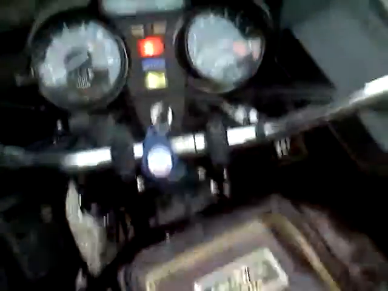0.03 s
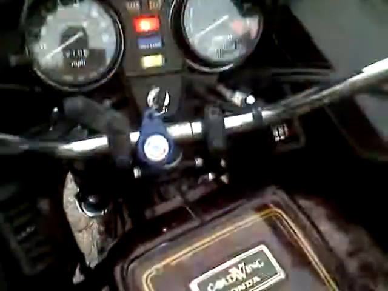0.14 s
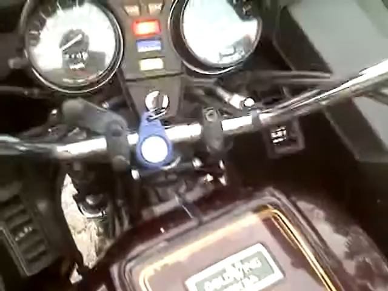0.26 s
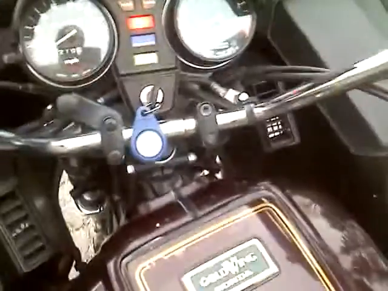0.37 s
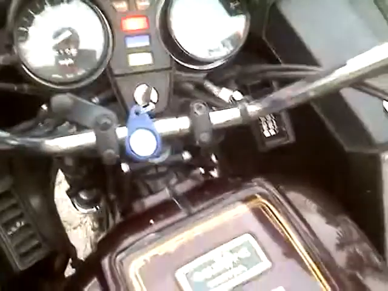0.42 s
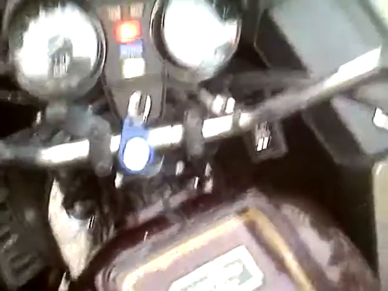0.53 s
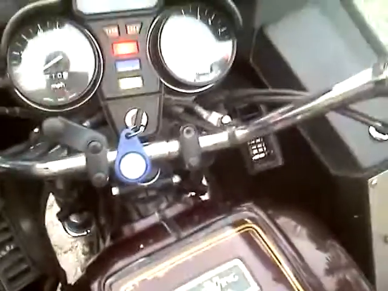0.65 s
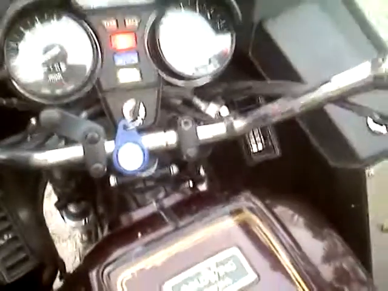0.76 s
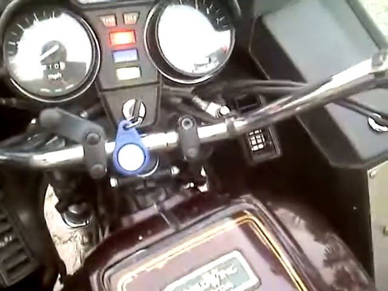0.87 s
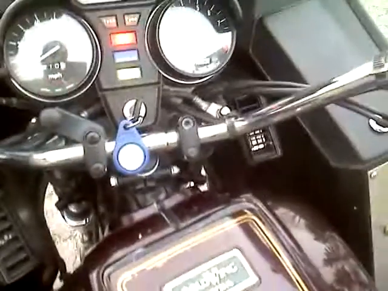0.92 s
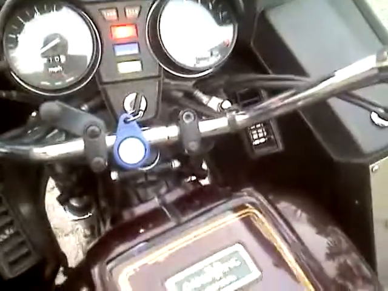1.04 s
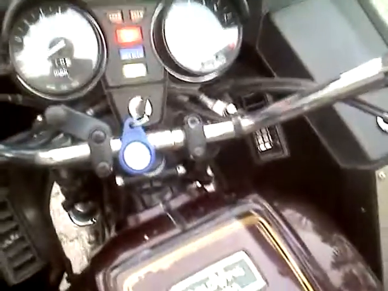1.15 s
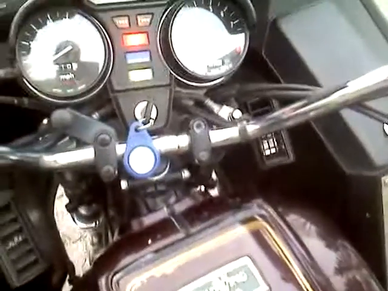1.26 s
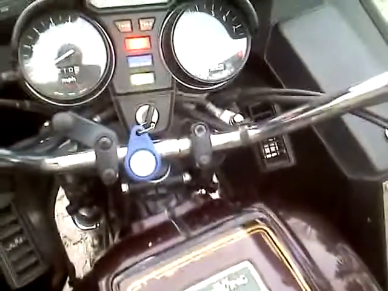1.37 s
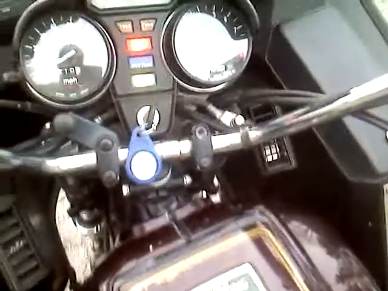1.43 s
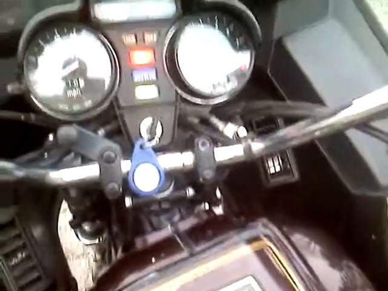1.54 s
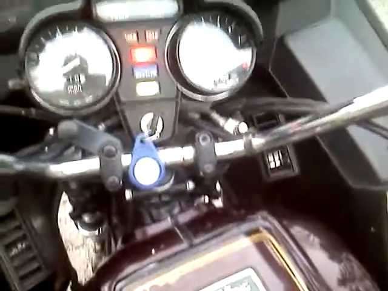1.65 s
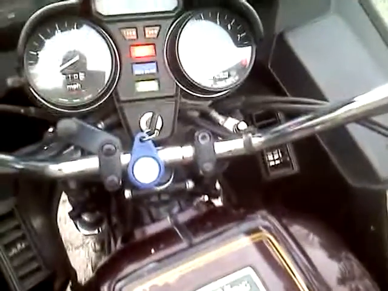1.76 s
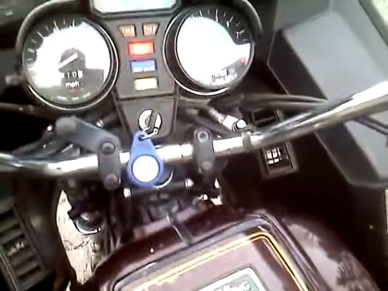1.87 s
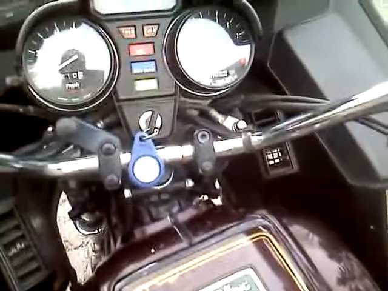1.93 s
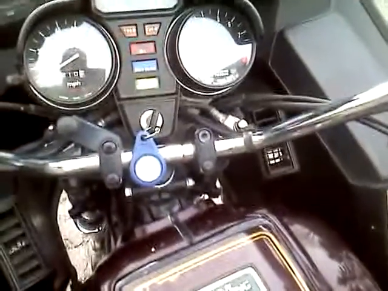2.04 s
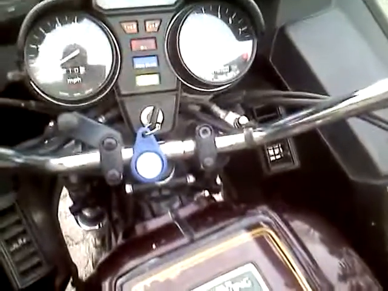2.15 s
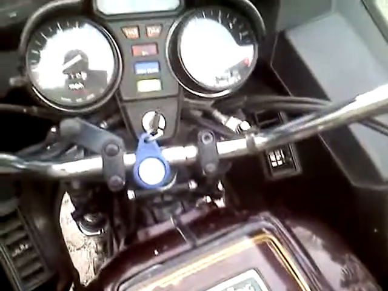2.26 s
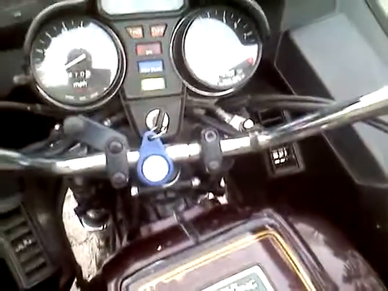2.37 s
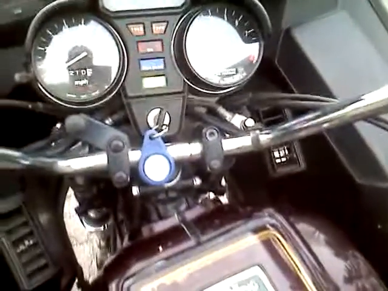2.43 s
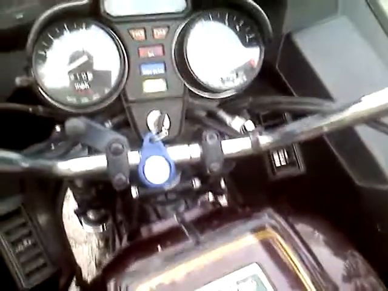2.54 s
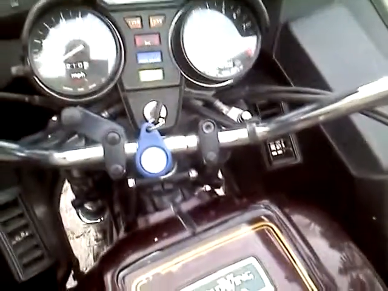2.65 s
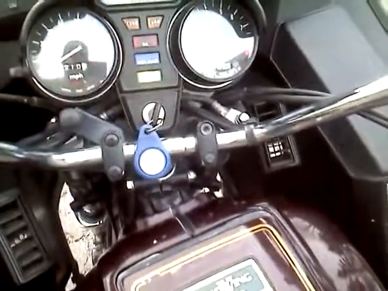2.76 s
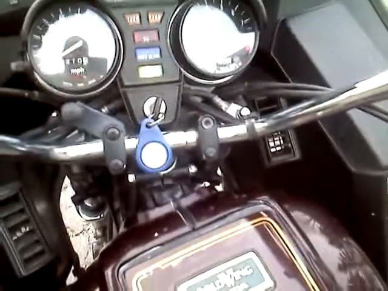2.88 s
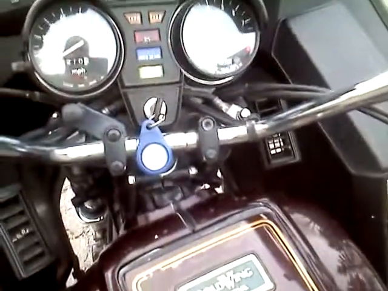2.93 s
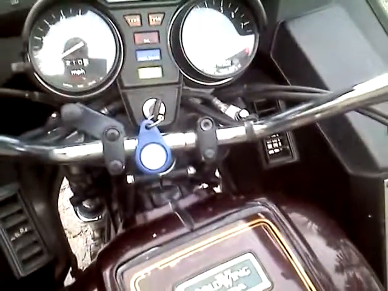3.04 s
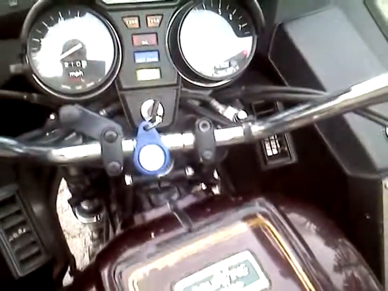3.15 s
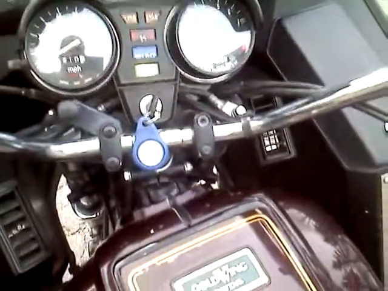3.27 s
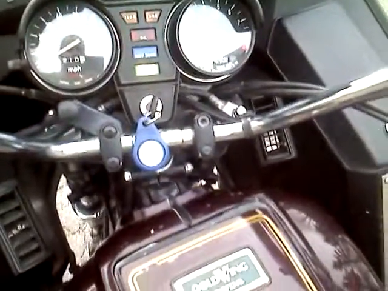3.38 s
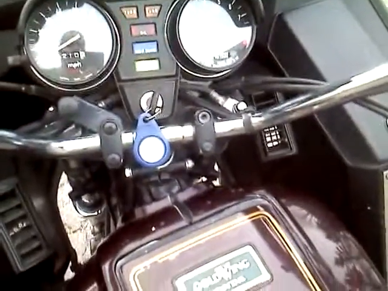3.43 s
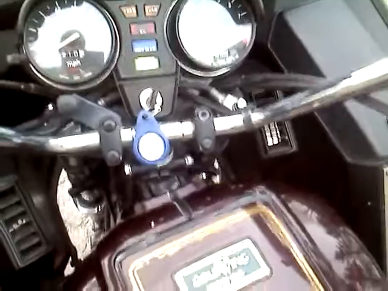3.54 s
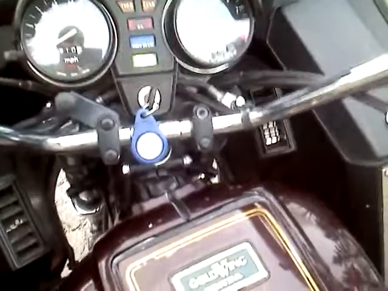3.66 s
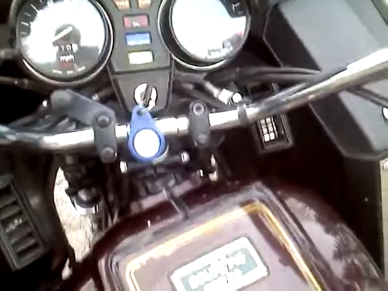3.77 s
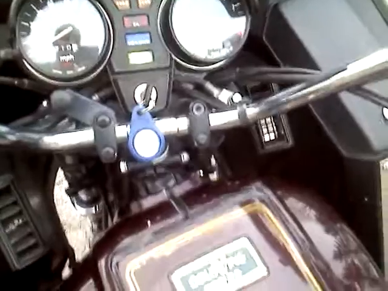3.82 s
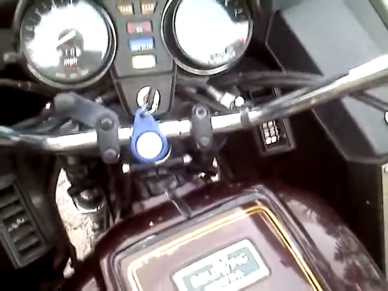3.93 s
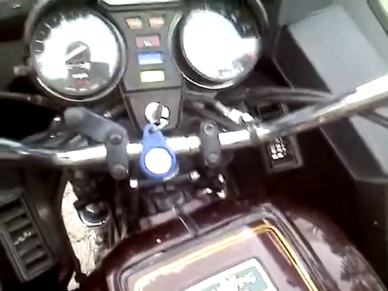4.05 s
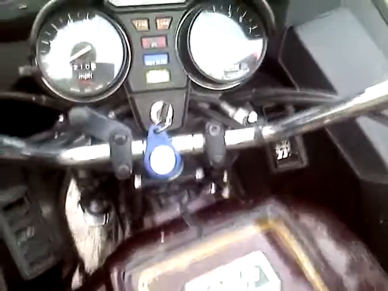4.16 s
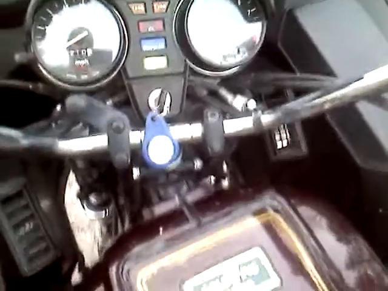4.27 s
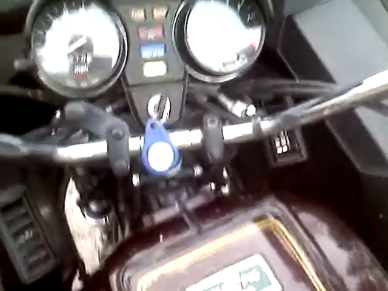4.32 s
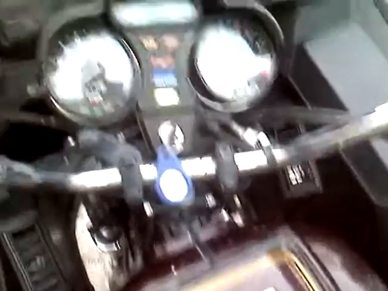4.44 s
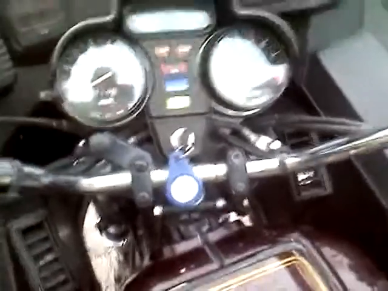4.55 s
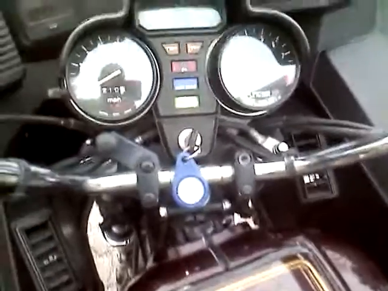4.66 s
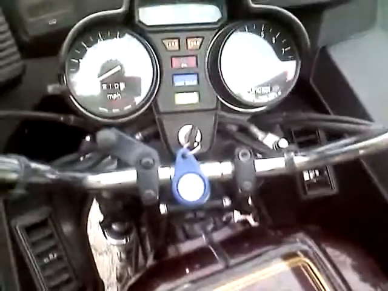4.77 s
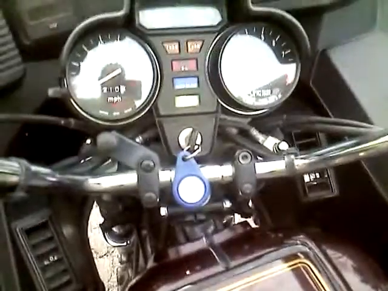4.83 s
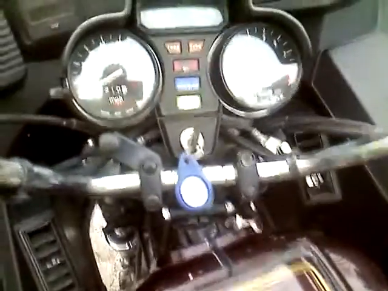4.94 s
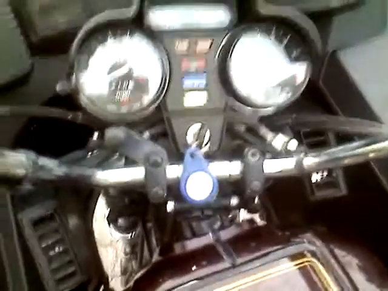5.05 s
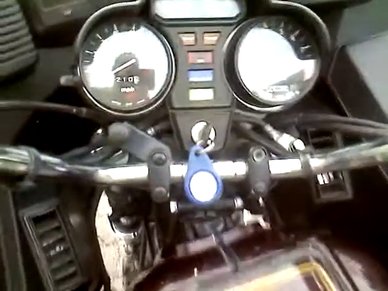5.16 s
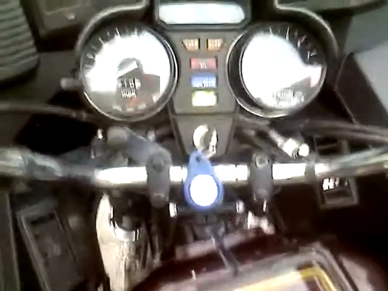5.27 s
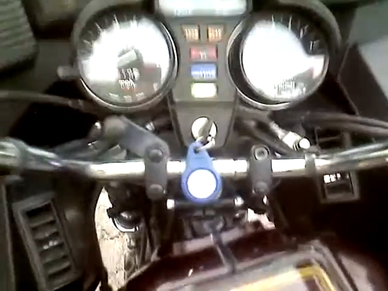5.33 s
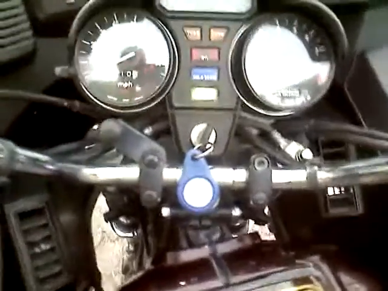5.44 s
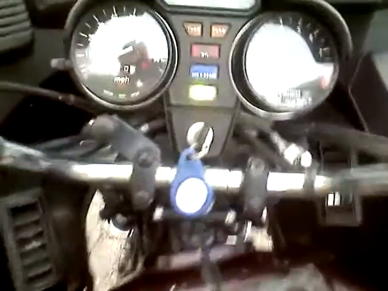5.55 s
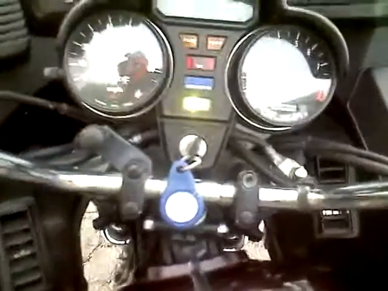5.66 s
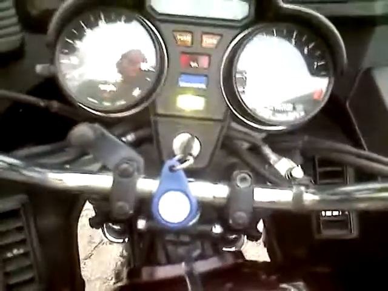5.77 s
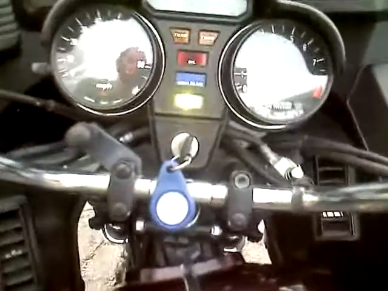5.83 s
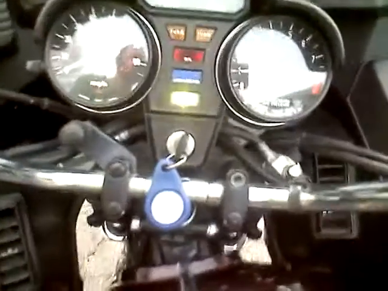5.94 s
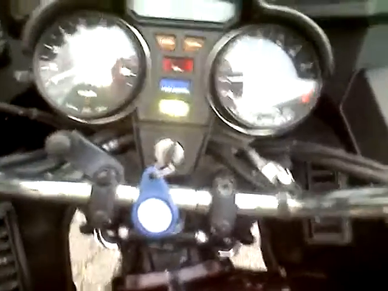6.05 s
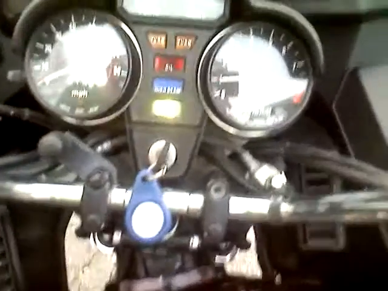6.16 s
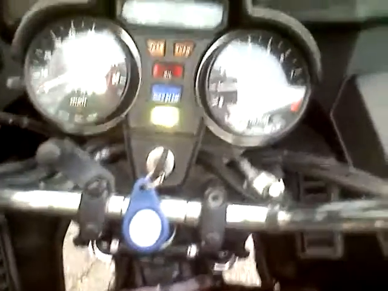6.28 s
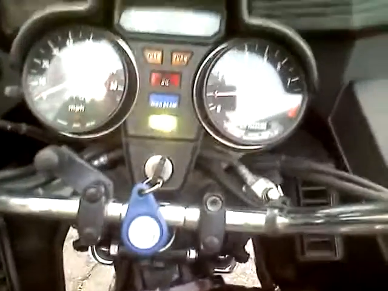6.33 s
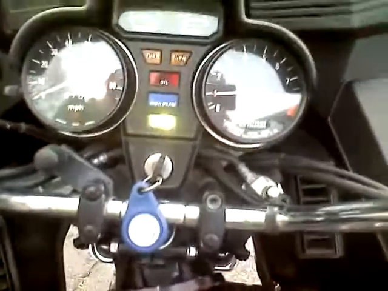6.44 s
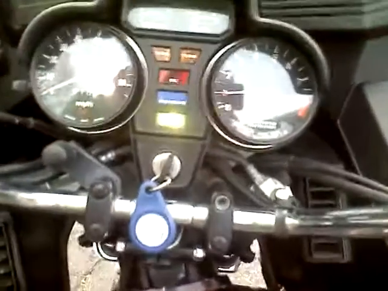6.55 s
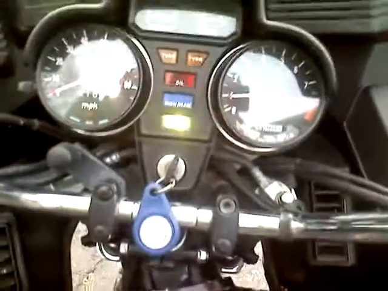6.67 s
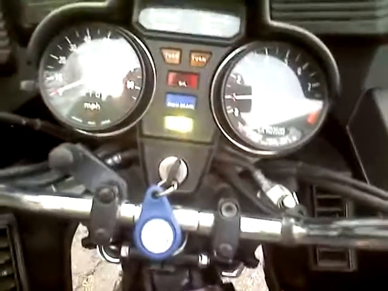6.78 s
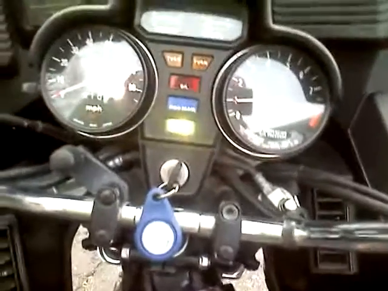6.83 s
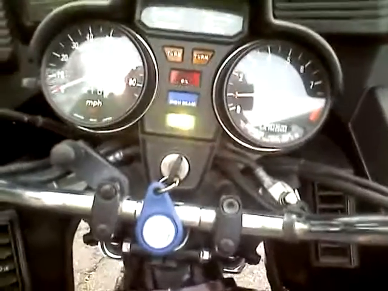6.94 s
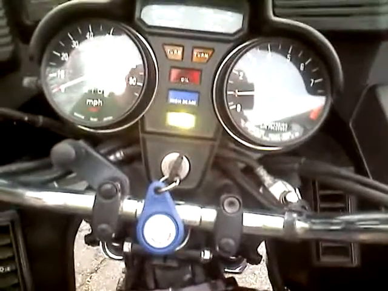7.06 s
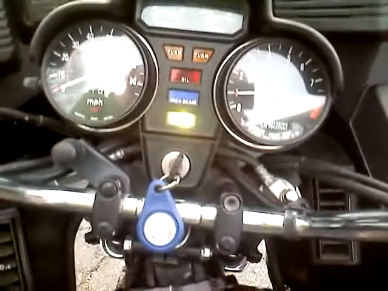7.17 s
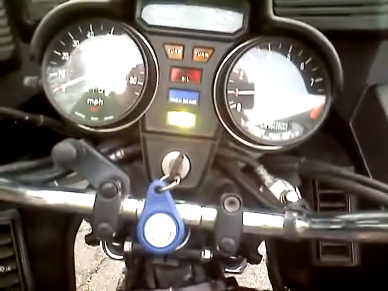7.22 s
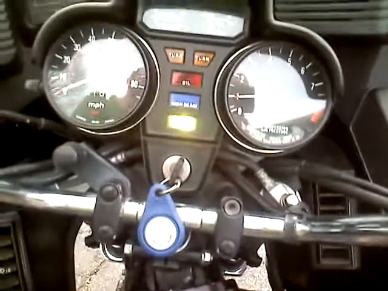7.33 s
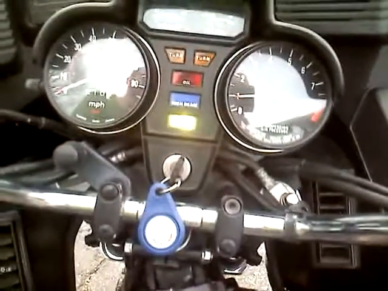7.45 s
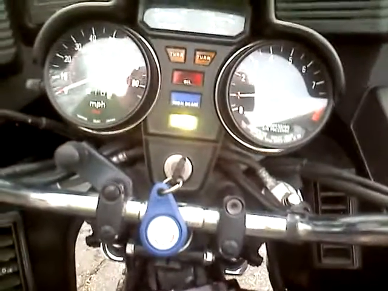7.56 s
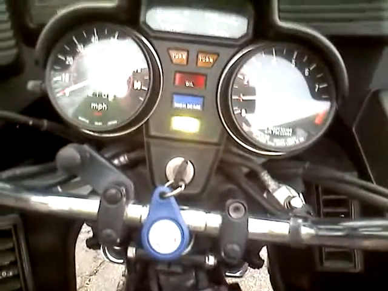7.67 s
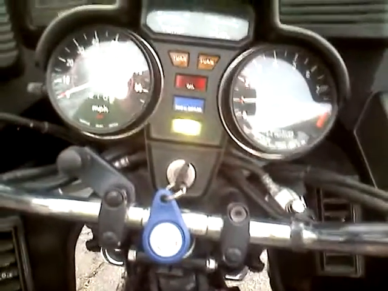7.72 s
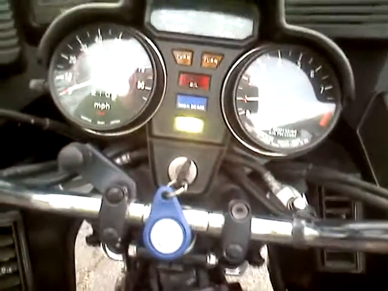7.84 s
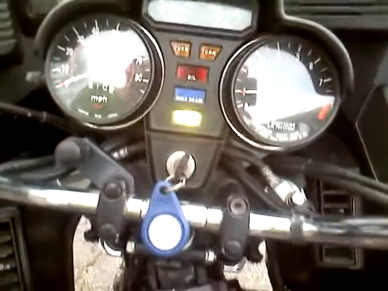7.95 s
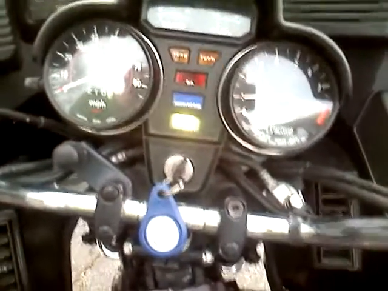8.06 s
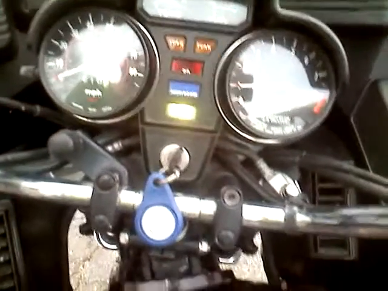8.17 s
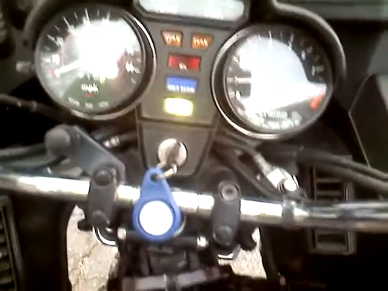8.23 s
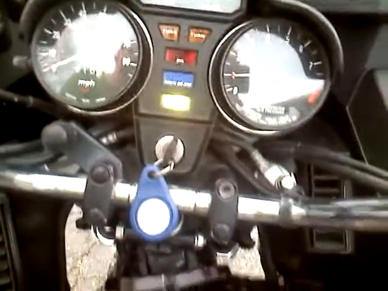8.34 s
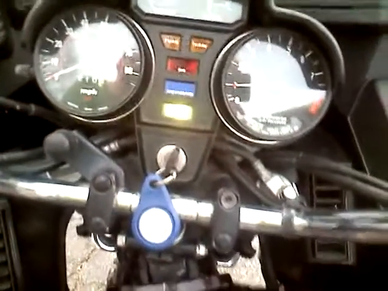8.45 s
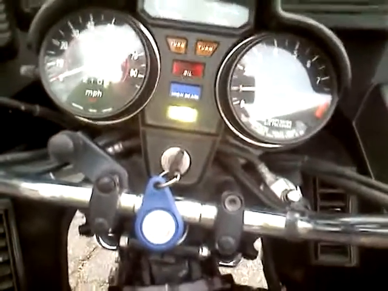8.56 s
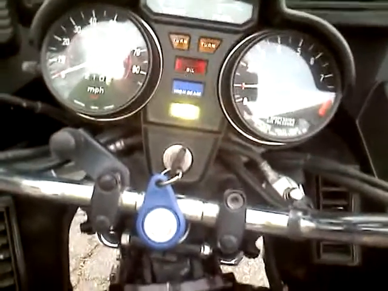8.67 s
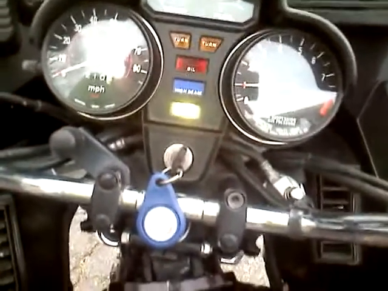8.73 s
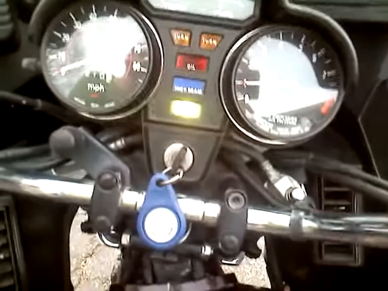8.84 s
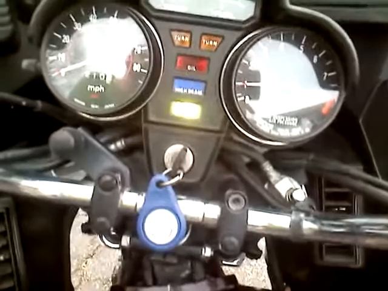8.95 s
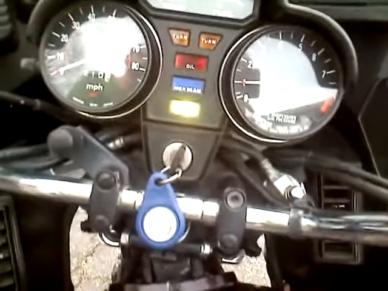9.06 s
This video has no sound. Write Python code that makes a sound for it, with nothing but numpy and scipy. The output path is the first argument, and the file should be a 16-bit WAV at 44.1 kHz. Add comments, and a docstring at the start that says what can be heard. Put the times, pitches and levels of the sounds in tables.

```python
"""A four-cylinder motorcycle engine, heard from the saddle: a loose part knocks once per cycle, bouncing in the case.
Under the knocks four firings a cycle drive churn, case hum and valve clatter, built from noise and resonances.
Before that cloth rustles and a switch thumps; the starter strikes and grinds on for a moment while the engine
catches and builds up.
Far traffic and a faint whine lie behind. A phone keeps the speech band, then clips the loud peaks."""
import sys
import numpy as np
from scipy import signal
from scipy.fft import rfft, irfft, next_fast_len
from scipy.io import wavfile
from scipy.ndimage import map_coordinates

SR = 44100
rng = np.random.default_rng(int(sys.argv[2]) if len(sys.argv) > 2 else 0)


def persist_wave(psi):
    """Save psi, clipped to +-1, as 16-bit WAV."""
    counts = np.round(np.clip(psi, -1, 1) * 32767).astype(np.int16)
    wavfile.write(sys.argv[1], SR, np.atleast_2d(counts).T)


N = 401310

# Knocks of the loose part, one per engine cycle: [t/s, blow level/dB, length of the bouncing/s]
KNOCK_TIMES = [(1.884, 1, 0.037), (1.958, 2, 0.019), (2.056, 1.5, 0.016), (2.154, 0.5, 0.017),
               (2.253, -1, 0.014), (2.358, 3, 0.011), (2.455, 1.5, 0.011), (2.559, -0.5, 0.015),
               (2.667, -1, 0.017), (2.776, 2, 0.015), (2.888, -1, 0.017), (3.004, 0.5, 0.018),
               (3.125, 2, 0.011), (3.248, 2, 0.024), (3.371, 3.5, 0.017), (3.499, 2.5, 0.015),
               (3.626, 1.5, 0.019), (3.756, -1, 0.018), (3.885, 0.5, 0.015), (4.019, 3, 0.015),
               (4.151, 1.5, 0.02), (4.28, 5.5, 0.016), (4.408, 3.5, 0.018), (4.534, 2, 0.018),
               (4.658, 1, 0.015), (4.781, 2, 0.017), (4.88, 2.5, 0.013), (5.003, -0.5, 0.018),
               (5.126, -0.5, 0.018), (5.248, 5.5, 0.013), (5.372, 3, 0.014), (5.497, -3, 0.017),
               (5.62, 1, 0.019), (5.744, 1.5, 0.018), (5.869, 0, 0.018), (5.992, -1, 0.02),
               (6.117, 4.5, 0.018), (6.243, 0.5, 0.019), (6.371, 1.5, 0.018), (6.501, 4.5, 0.016),
               (6.627, 1.5, 0.02), (6.757, 3.5, 0.016), (6.882, 1.5, 0.017), (7.009, 2, 0.02),
               (7.135, 2.5, 0.016), (7.262, 1.5, 0.02), (7.387, 2.5, 0.018), (7.512, 1, 0.016),
               (7.635, 3, 0.018), (7.762, 1.5, 0.019), (7.886, 2.5, 0.018), (8.011, 3.5, 0.017),
               (8.138, 2.5, 0.02), (8.261, 0.5, 0.018), (8.385, 2.5, 0.021), (8.509, -0.5, 0.018),
               (8.634, 1.5, 0.017), (8.754, 2.5, 0.017), (8.877, 1, 0.016), (9.001, 2.5, 0.019)]
# Engine case resonances: [f/Hz, width/Hz, relative level over the tank/dB, over the handlebar/dB]
CASE_MODES = [(580, 40, -5, -1), (650, 35, -7, -4), (733, 50, -4, .5), (845, 35, 1, -3),
              (1060, 150, -12, -12), (1400, 250, -18, -18)]
# Frame and tank resonances: [f/Hz, width/Hz, relative level over the tank/dB, over the handlebar/dB]
FRAME_MODES = [(216, 69, -7, -12.5), (297.7, 65, 1, -2), (385, 250, -9.5, -7.5)]
# Valve cover resonances: [f/Hz, width/Hz, relative level over the tank/dB, over the handlebar/dB]
COVER_MODES = [(1800, 100, -6, -12), (2100, 200, -9, -10), (2500, 300, -9, -10), (3090, 90, -8, 0),
               (3300, 130, 0, -3)]

CATCH_S = 1.71  # the engine catches
SCENE_HZ = 6000  # upper limit of the filtered sources


def knocks():
    """The loose part bounces a few times: the case rings at once, the heavier frame follows, the metal rattles on."""
    # low noise of the frame: [f/Hz, relative level/dB per Hz]
    boom_points = [(25, -35.5), (60, -12.5), (150, -18), (220, -3.5), (300, -2.5), (400, -0.5), (480, -5.5),
                   (800, -24.5), (3300, -99)]
    # bright noise of shaken metal: [f/Hz, relative level/dB per Hz]
    rattle_points = [(200, -26), (450, -26), (560, 3), (800, -1.5), (1100, -4.5), (1500, -6), (2300, -6),
                     (2800, -5), (3150, -3.5), (3300, -6.5)]
    contacts, bounce_s = 6, 0.0069
    thud_db, first_thuds_db, first_thuds_s = -11, 10, 0.18  # thuds are heavier at the catch, then settle
    thud_scatter_db, rattle_scatter_db, blow_scatter_db = 1.8, 1, 1
    rattle_back_db, rattle_forward_db = -11, -8

    s, blow_db, length = np.transpose(KNOCK_TIMES)[:, :, None]
    count = len(s)
    after = np.arange(contacts) * bounce_s
    times = s - 0.0012 + after + 0.00019 * rng.standard_normal((count, contacts))
    lasting = amp(-30 * after) / (1 + (after / length) ** 6)  # the bouncing stops rather suddenly
    size = amp(blow_db + blow_scatter_db * rng.standard_normal((count, contacts))) * lasting

    blows = impulses(times, size)
    # tiny contacts between the bounces
    chatter = amp(-24.5) * dying(blows, 0.0021, 0.064) * rng.standard_normal(N)
    case = amp(28.5) * ringing(blows + chatter, CASE_MODES)

    thud = thud_db + first_thuds_db * np.exp(-np.abs(s - CATCH_S) / first_thuds_s)
    thud = thud + thud_scatter_db * rng.standard_normal((count, 1))
    gathering = np.clip(after / 0.014, 0, 1) ** 2  # the frame gathers swing
    pushes = impulses(times, size * gathering * amp(thud))
    boom = amp(-1.5) * dying(pushes, 0.0033, 0.08) * noise(boom_points)
    frame = amp(38) * ringing(pushes, FRAME_MODES) + boom

    rattle_scatter = rattle_scatter_db * rng.standard_normal((count, 1))
    shaking = impulses(times - 0.0015, size * amp(rattle_scatter))
    shaking = shaking * amp(brightness_db(rattle_back_db, rattle_forward_db))
    short_tail = dying(shaking, 0.0014, 0.054)
    long_tail = amp(-27.5) * dying(shaking, 0.005, 0.82)
    rattle = (short_tail + long_tail) * noise(rattle_points)
    return case + frame + rattle


def running():
    """Four firings a cycle drive churn, hum and clatter, which build up together at the catch."""
    build_up_s = 0.13
    firings = firing_blows()
    beat = dying(firings, 0.0023, 0.068)
    since = np.clip(np.arange(N) / SR - CATCH_S, 0, None)
    started = 1 - np.exp(-since / build_up_s)
    return started * (churn(beat) + hum(beat) + clatter(firings))


def firing_blows():
    """The four cylinders fire in turn between one knock and the next, slightly uneven in time and strength."""
    # strength of each firing in a cycle: [level/dB]
    cylinder_db = np.array([-1, 1.2, -3, -2])
    s = np.transpose(KNOCK_TIMES)[0]
    cycle = np.append(np.diff(s), 0.125)[:, None]
    phase = (np.arange(4) + 0.899) / 4 + 0.006 * rng.standard_normal((len(s), 4))
    times = s[:, None] + cycle * phase
    return impulses(times, amp(cylinder_db + rng.standard_normal((len(s), 4))))


def churn(beat):
    """Broad engine noise, lifted by every firing over a steady floor."""
    # [f/Hz, relative level/dB per Hz]
    churn_points = [(15, -54), (25, -26.5), (152, -9.5), (253, -4), (412, -7.5), (831, 3), (1070, -2.5),
                    (1270, -3.5), (1640, -8), (1900, -3), (2070, -7), (2910, -5.5), (3230, -6),
                    (4000, -9.5), (5200, -54.5), (8800, -120)]
    level_db = -21.5
    flutter = amp(3 * np.tanh(wobble(60)))
    return amp(level_db) * unit((0.584 + beat) * flutter) * noise(churn_points)


def hum(beat):
    """Noise that pulses with the firings rings in the frame and the case."""
    level_db = -29
    push = (0.18 + beat) * rng.standard_normal(N)
    return amp(level_db) * unit(ringing(push, FRAME_MODES[1:] + CASE_MODES))


def clatter(firings):
    """Dense small valve impacts, stronger at each firing, ring in the valve cover and come and go."""
    back_db, forward_db = -29, -22
    swing_db = 6  # either way
    spiky = np.tanh(0.46 * rng.standard_normal(N) * amp(1.3 * rng.standard_normal(N)))
    pulse = 0.5 + dying(firings, 0.001, 0.0176)
    swing = amp(swing_db * np.tanh(wobble(110)))
    cover = unit(ringing(pulse * swing * spiky, COVER_MODES))
    return amp(brightness_db(back_db, forward_db)) * cover


def ticks():
    """A few loud single valve blows ring the two highest modes of the cover."""
    # [t/s, blow level/dB]
    tick_blows = [(5.9518, 26.5), (5.96, 16.5), (6.1727, 30), (6.2008, 25.5), (6.2102, 21), (7.064, 18),
                  (7.0964, 22)]
    s, db = np.transpose(tick_blows)
    return ringing(impulses(s, amp(db)), COVER_MODES[3:])


def starter():
    """The pinion strikes the ring gear, then teeth grind in the housing, straining at each compression."""
    # one blow of pinion on ring gear: (t/s, blow level/dB)
    engage_s, engage_db = (1.69, 16)
    # steady drag, then the strain against each compression: [t/s, level/dB, hold/s]
    strain_swells = [(1.688, -19, 0.31), (1.697, -11.5, 0.016), (1.725, -13, .015), (1.742, -5.5, 0.042),
                     (1.826, -1.5, 0.039), (1.879, -4.5, 0.037)]
    # starter housing resonances: [f/Hz, width/Hz, relative level/dB]
    housing_modes = [(900, 88, -20), (1190, 135, -4.5), (1790, 22, -0.5), (1936, 230, -9.5),
                     (2406, 48, -11), (2600, 89, -7.5), (3430, 760, -7)]
    # grinding noise: [f/Hz, relative level/dB per Hz]
    grind_points = [(24, -46), (40, -20), (259, -14.5), (571, -5.5), (629, -3), (1210, -6), (1560, -5),
                    (3300, -0.5), (4000, -16.5), (5200, -46.5), (8800, -120)]
    strike_modes = [(2550, 620, 0), (3220, 500, 0.000068)]
    rise_s, t60_s = 0.0072, 0.055

    strike = filtered(impulses([engage_s], amp([engage_db])), modes(strike_modes))
    housing = unit(filtered(rng.standard_normal(N), modes(housing_modes)))
    grind = 0.56 * housing + 0.77 * noise(grind_points)
    strain = swells(strain_swells, rise_s, t60_s)
    return strike + strain * amp(1.8 * wobble(90)) * grind


def thump():
    """The switch: dull blows ring a plastic panel as decaying sines, with a puff of noise."""
    # [t/s, blow level/dB]
    switch_blows = [(1.2559, -33.5), (1.2609, -26), (1.291, -37)]
    # panel resonances: [f/Hz, relative level/dB, t60/s]
    panel_modes = [(150, -7, .06), (240, 1, .08), (420, -11, .05), (540, -12, .05), (668, 0, 0.062),
                   (866, -5, .04), (1110, -8, .04), (1450, -11, .035), (1900, -10, .035), (2250, -13, .035)]
    puff_points = [(80, -25), (250, -6.0), (700, -10), (2200, -20), (3300, -50)]  # f/Hz, level/dB
    out, t = np.zeros(N), np.arange(SR // 4) / SR
    for s, db in switch_blows:
        ring = np.zeros(len(t))
        for hz, level, t60 in panel_modes:
            decay = amp(level + rng.normal(0, 1) - 60 * t / t60)
            ring += decay * np.sin(2 * np.pi * hz * t)
        out[round(s * SR):][:len(t)] += amp(db) * ring * (1 - np.exp(-t / 0.0016))
    s, db = np.transpose(switch_blows)
    puff = dying(impulses(s, amp(db - 13)), 0.0022, 0.17) * noise(puff_points)
    return out + puff


def cloth():
    """Cloth rubs as swells of coloured noise with a fast, uneven level."""
    # [t/s, level/dB, hold/s]
    rustle_swells = [(0, -50, .05), (.14, -42, 0.017), (.42, -41, 0.061), (.668, -47.5, 0.027),
                     (1.19, -46.5, 0.03), (1.255, -47, .01), (1.52, -47.5, 0.027), (1.63, -54, .03)]
    # [f/Hz, relative level/dB per Hz]
    cloth_points = [(120, -36.5), (200, -12.5), (343, -4), (559, -14), (1100, -9), (1190, -11),
                    (3150, -7.5), (4000, -8), (5200, -49.5), (8800, -120)]
    rise_s, t60_s = 0.0027, 0.49
    return swells(rustle_swells, rise_s, t60_s) * amp(1.7 * wobble(120)) * noise(cloth_points)


def whine():
    """Faint sines whose level and phase waver around a constant pitch."""
    # [f/Hz, mean amplitude/dB]
    whine_tones = [(1238, -76), (2067, -67), (2896, -65)]
    t = np.arange(N) / SR
    out = np.zeros(N)
    for hz, db in whine_tones:
        out += amp(db + 4.8 * wobble(32)) * np.sin(2 * np.pi * hz * t + 1.6 * wobble(22))
    return out


def air():
    """Far traffic and air: coloured noise that slowly wavers in level."""
    # [f/Hz, relative level/dB per Hz]
    air_points = [(15, -55.5), (25, -34.5), (200, -2.5), (478, -2.5), (521, -5.5), (924, 1), (1900, -11),
                  (2070, -8), (2510, -13), (2850, -11.5), (3040, -9.5), (3600, -11), (4000, -19),
                  (5200, -55.5), (8800, -120)]
    level_db = -48.5
    return amp(level_db + 0.8 * wobble(5.8)) * noise(air_points)


def forward_share():
    """Phone position along the machine: 0 over the tank, 1 over the handlebar."""
    # [t/s, forward share 0-1]
    drift = [(0, 0.17), (4.6, 0.07), (6, 0.93), (9.1, 0.85)]
    s, share = np.transpose(drift)
    return np.interp(np.arange(N) / SR, s, share)


def brightness_db(back_db, forward_db):
    """Level of bright metal: extra at the catch, then settling, and shifting as the phone moves."""
    flare_db, flare_s = 6, 0.54
    since = np.clip(np.arange(N) / SR - CATCH_S, 0, None)
    place_db = back_db + (forward_db - back_db) * forward_share()
    return place_db + flare_db * np.exp(-since / flare_s)


def ringing(x, table):
    """x through a body whose modes have two sets of strengths, blended as the phone moves."""
    share = forward_share()
    rows = np.array(table)
    back = filtered(x, modes(rows[:, [0, 1, 2]]))
    forward = filtered(x, modes(rows[:, [0, 1, 3]]))
    return (1 - share) * back + share * forward


def modes(table):
    """The causal response of a set of resonances; neighbours swing in opposite senses."""
    def response(f):
        total = 0
        for k, (centre, width, db) in enumerate(table):
            damping = 1j * f * width
            total = total + (-1) ** k * amp(db) * damping / (centre ** 2 - f ** 2 + damping)
        return total
    return response


def impulses(seconds, sizes):
    """Single-sample blows."""
    at = np.round(np.ravel(seconds) * SR).astype(int)
    keep = at < N
    return np.bincount(at[keep], np.ravel(sizes)[keep], N)


def dying(x, rise, t60):
    """Each blow becomes a swell that rises and dies; both times in s."""
    t = np.arange(int(t60 * SR)) / SR
    return signal.oaconvolve(x, (1 - np.exp(-t / rise)) * amp(-60 * t / t60))[:N]


def swells(rows, rise_s, t60_s):
    """Gain of (t/s, level/dB, hold/s) swells: each rises, holds and dies away."""
    t = np.arange(N) / SR
    out = np.zeros(N)
    for s, db, hold in rows:
        start = round(s * SR)
        age = t[start:][:SR] - s
        fall_db = 60 * np.clip(age - hold, 0, None) / t60_s
        out[start:][:SR] += (1 - np.exp(-np.abs(age) / rise_s)) * amp(db - fall_db)
    return out


def noise(points):
    """Coloured noise of rms 1; above the speech band it keeps the level at the band's edge."""
    edge_hz = 3300
    gain = colour(points)
    return unit(filtered(rng.standard_normal(N), lambda hz: gain(np.minimum(hz, edge_hz))))


def colour(points):
    """The gain of (f/Hz, level/dB) points on a log axis; the last level holds above the last point."""
    f, db = np.transpose(points)
    return lambda hz: amp(np.interp(np.log(hz + 1), np.log(f + 1), db))


def filtered(x, response, top_hz=SCENE_HZ):
    """x times a complex response of frequency, with nothing above top_hz."""
    m = next_fast_len(N + SR // 2)  # room for the ringing
    hz = np.fft.rfftfreq(m, 1 / SR)
    hz = hz[hz < top_hz]
    return irfft(rfft(x, m)[..., :len(hz)] * response(hz), m)[..., :N]


def wobble(rate):
    """A smooth random curve of rms 1, rate knots a second."""
    knots = rng.standard_normal(int(N * rate / SR) + 4)
    return unit(map_coordinates(knots, [np.arange(N) * rate / SR]))


def unit(x):
    """x at rms 1."""
    return x / np.sqrt(np.mean(x ** 2) + 1e-20)


def amp(db):
    """Gain of a level in dB."""
    return 10 ** (np.asarray(db) / 20)


def scene():
    """Everything adds up at one microphone."""
    engine = knocks() + running() + ticks()
    return (engine + starter() + thump() + cloth() + whine() + air())[None]


def record(dry):
    """The speech band first; then overload squares off the peaks, which adds the only treble above the band."""
    # phone response: [f/Hz, gain/dB]
    band_points = [(20, -16), (60, 3), (120, 4), (3300, 0.5), (3600, -4), (4000, -17), (4400, -29.5),
                   (4700, -67), (5000, -92), (5300, -120)]
    full_scale, top_hz = 0.68, 16000
    narrow = filtered(dry, colour(band_points))
    clipped = np.clip(narrow, -full_scale, full_scale)
    return filtered(clipped, np.ones_like, top_hz)


dry = scene()
out = record(dry)
persist_wave(out)
```